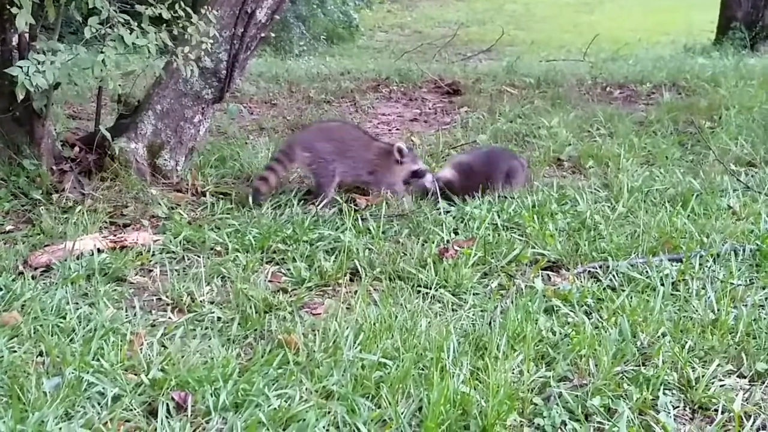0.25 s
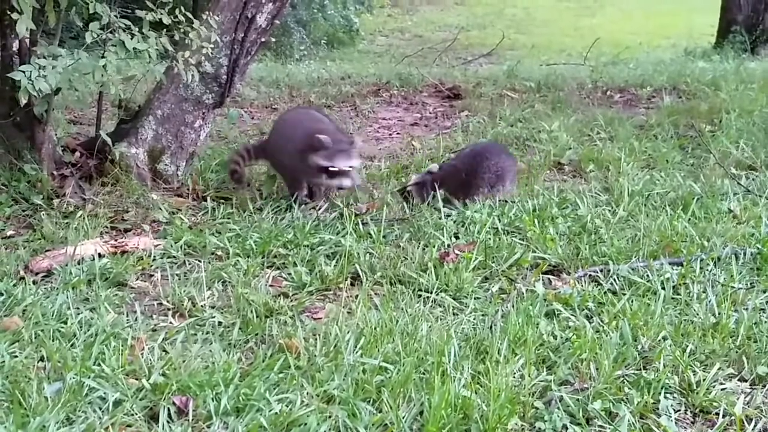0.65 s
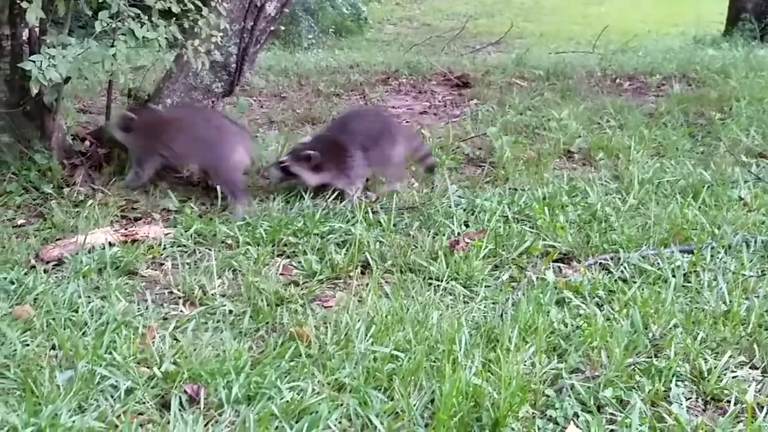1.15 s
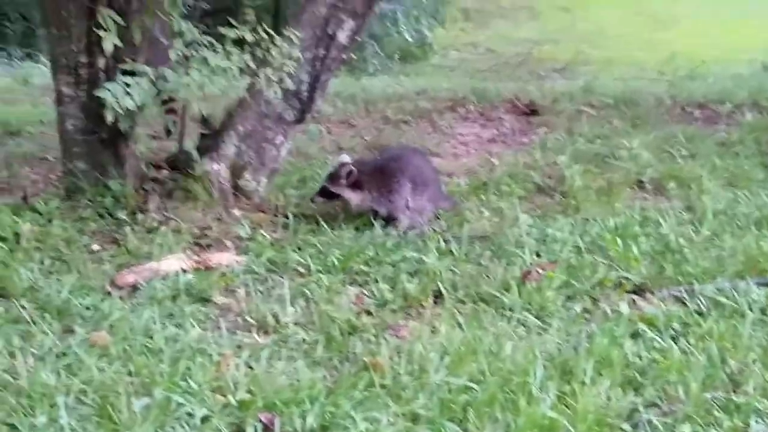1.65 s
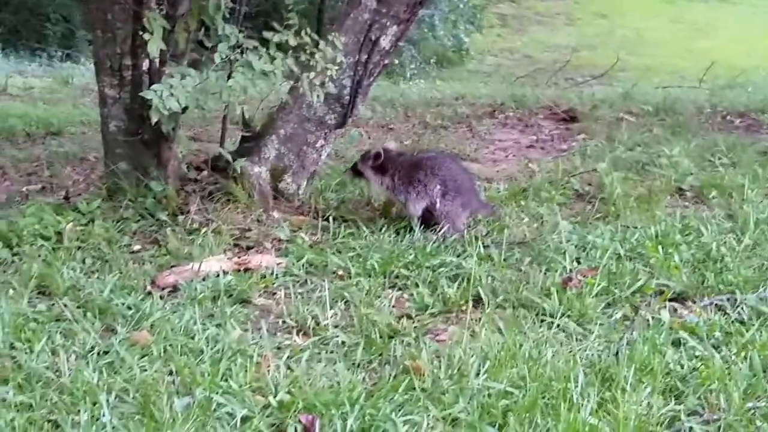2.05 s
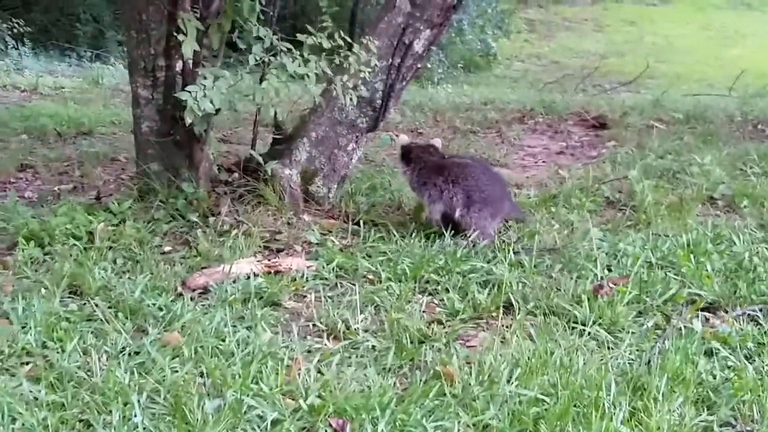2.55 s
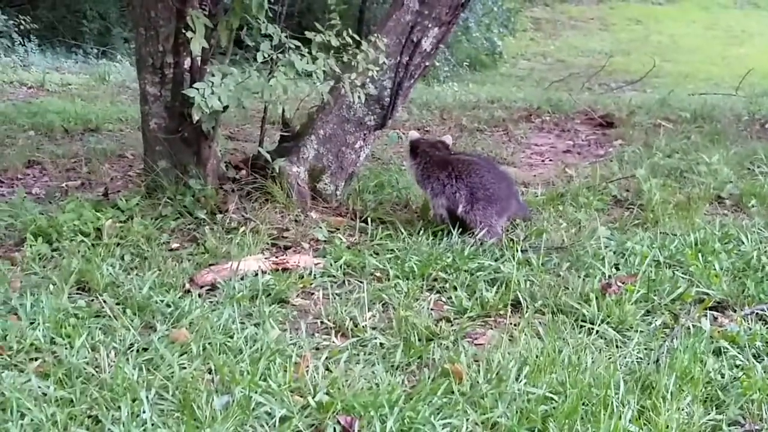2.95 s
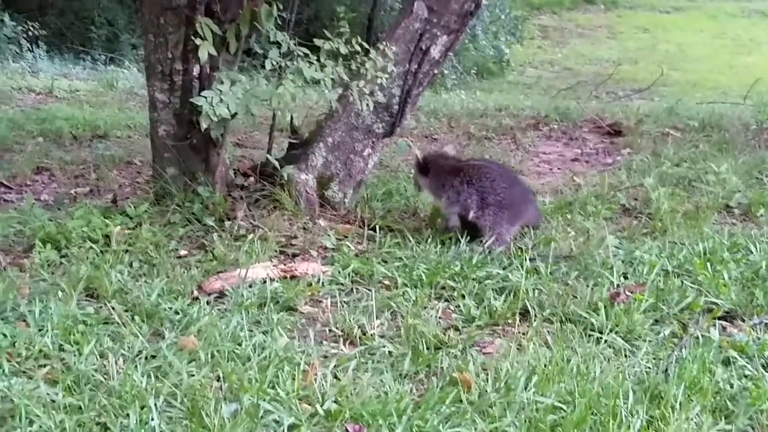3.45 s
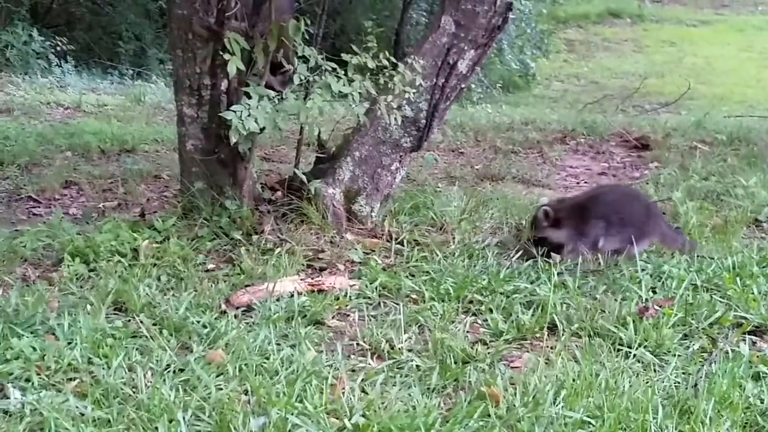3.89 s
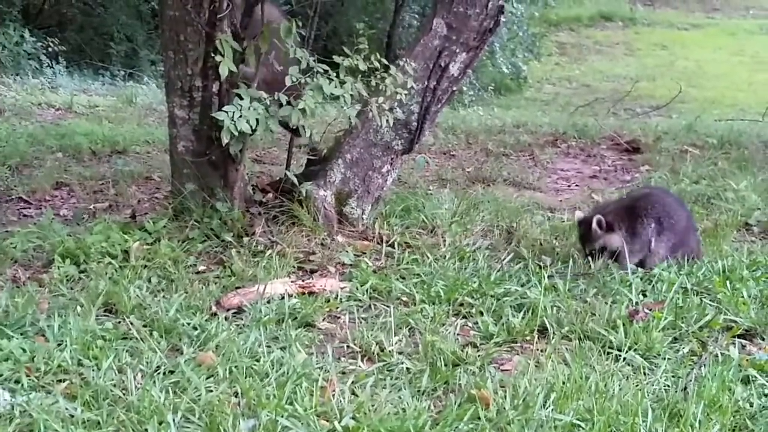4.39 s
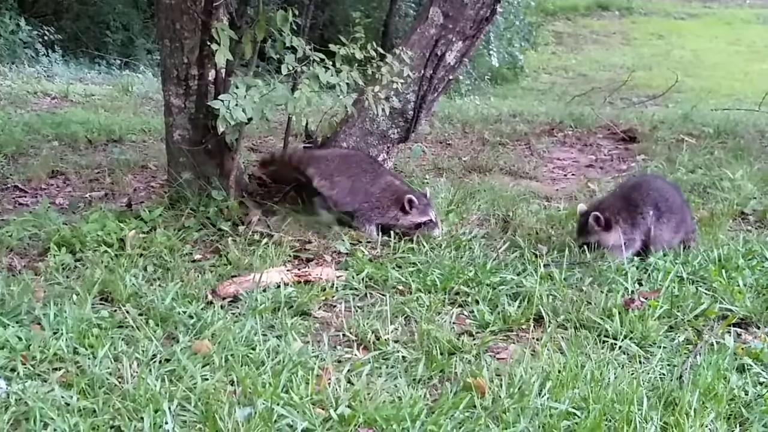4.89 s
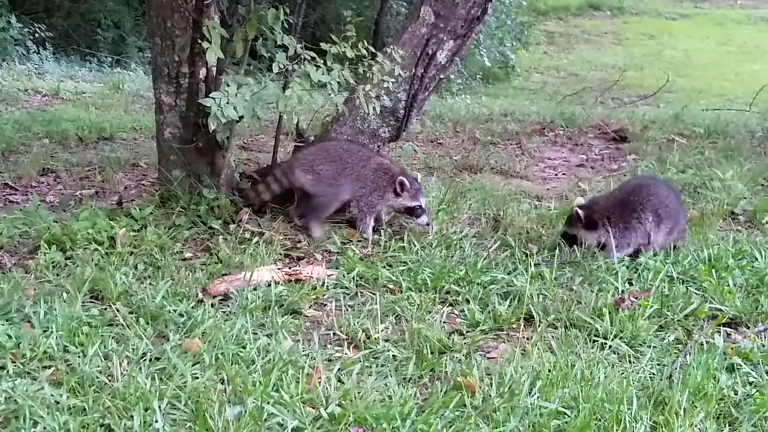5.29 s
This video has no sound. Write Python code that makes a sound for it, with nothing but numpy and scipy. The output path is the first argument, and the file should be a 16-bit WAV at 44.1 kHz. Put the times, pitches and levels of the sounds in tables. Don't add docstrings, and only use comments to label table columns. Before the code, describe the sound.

A steady high insect choir shimmers over faint rumble while distant birds whistle, leaves rustle, and sharp twig snaps click, loudest near the end.

```python
import sys
import numpy as np
from scipy import signal
from scipy.fft import rfft, irfft, next_fast_len
from scipy.io import wavfile
from scipy.ndimage import map_coordinates

SR = 44100
rng = np.random.default_rng(int(sys.argv[2]) if len(sys.argv) > 2 else 0)


def gain_from_db(level_db):
    decades = np.asarray(level_db, float) / 20
    return 10 ** decades


def materialize(psi):
    bounded = np.clip(np.atleast_2d(psi).T, -1, 1)
    quanta = np.round(bounded * 32767).astype(np.int16)
    wavfile.write(sys.argv[1], SR, quanta)


N = 243873

# resonance_hz, width_hz, level_db, left_right_db, strokes_per_s, throb_depth (0-1)
INSECTS = [
    (6395, 240, -61, -8, 79, 0.5),
    (6673, 337, -51, -10, 47, 0.21),
    (6938, 317, -52, -10.5, 109, 0.3),
    (7078, 240, -55, -1, 179, 0.07),
    (8830, 400, -64.5, -15.5, 110, 0.1),
    (9046, 340, -63, 9, 93, 0.1),
    (9440, 430, -71, 3.5, 67, 0),
]
# time_s, level_db
INSECT_SWELL = [(0.0, -47), (5.53, -48)]
INSECT_SWELL_MEAN_DB = -48.5

# start_s, length_s, first_pitch_hz, last_pitch_hz, peak_db
GLIDE_CALLS = [
    (.085, .2, 3900, 4500, -56.5),
    (1.76, .22, 3800, 4130, -58.5),
    (3.1, .09, 3880, 4220, -53.5),
    (4.655, .2, 3780, 4280, -55),
]
RISE_CALLS = [
    (.06, .04, 1950, 2050, -65),
    (.12, .12, 2180, 2740, -56.5),
    (3.38, .02, 2080, 2150, -62),
    (3.42, .15, 2030, 2600, -59),
    (3.57, .04, 2480, 2130, -61),
    (3.61, .02, 2450, 2600, -59),
]
PEEP_CALLS = [(0, .04, 3290, 3260, -64), (.59, .04, 2200, 2300, -63), (.67, .03, 2900, 2820, -66),
              (.74, .02, 2170, 2170, -65), (.81, .04, 2300, 2230, -64), (1.14, .06, 3130, 3230, -66),
              (1.23, .12, 3120, 3040, -61), (1.4, .05, 3060, 3070, -66), (1.15, .07, 2400, 2410, -66),
              (1.27, .04, 2280, 2300, -67), (1.335, .02, 2230, 2190, -62)]
CALL_ATTACK_DB_PER_S, CALL_RELEASE_DB_PER_S = 450, 250
WOOD_T60_S = .5

# frequency_hz, density_db_per_hz
LEAF_SPECTRUM = [(500, -27), (3000, -18.5), (5200, -18.5), (7900, -12.5), (8900, 4), (10500, -8),
                 (12600, -0.5), (14600, -8.5), (15200, -17), (18000, -50)]
# time_s, level_db
STIRRING = [(0, -61), (1.1, -65.5), (1.85, -62), (1.97, -67), (2.3, -71.5), (3.0, -67.5), (3.9, -65.5),
            (4.9, -62.5), (5.28, -67), (5.53, -62)]
# start_s, hold_s, peak_db, left_right_db
LEAF_SCUFFLES = [(0.076, 0.018, -51.5, -0.5), (0.575, 0.047, -63, 1), (1.252, 0.059, -57, 0),
                 (1.374, .04, -61, -2), (1.53, .03, -63, -4), (1.79, .04, -67, 1.5), (3.13, 0.036, -65, .5),
                 (3.42, 0.19, -63.5, .5), (3.785, .05, -59, -2), (3.923, .07, -65, -1.5),
                 (4.055, .04, -60, -1.5), (4.228, .015, -58.5, 2.5), (4.29, .02, -66, -4),
                 (4.44, 0.046, -59.5, -2.5), (4.708, 0.035, -54, -1.5), (4.939, .04, -62, 0.5)]
# start_s, hold_s, peak_db, left_right_db
CLAW_SCRAPES = [
    (3.785, .05, -56, -2.5),
    (4.055, .04, -52.5, -2.5),
    (4.14, .015, -55, -3),
    (4.95, .03, -61, -1.5),
]
# frequency_hz, density_db_per_hz
BARK_SPECTRUM = [(6000, -30), (10000, -14), (12300, .5), (13800, -1.5), (14700, -8), (15200, -22),
                 (18000, -50)]
STIR_ATTACK_DB_PER_S, STIR_RELEASE_DB_PER_S = 246, 160

# start_s, peak_db, left_right_db, pitch_hz
TWIG_SNAPS = [(.442, -40, 0.1, 13000), (1.1608, -33, -3, 12400), (1.3456, -39, -2, 11600),
              (1.3917, -38, 0.1, 11500), (1.5135, -44, -2, 12000), (1.6013, -38, 1.5, 10400),
              (1.7828, -36, 4, 11900), (1.8264, -34, 2.5, 11500), (1.9979, -43, 8, 10800),
              (2.6688, -45, 6, 11900), (3.036, -42, 1.5, 13000), (4.2363, -30, 7, 11200),
              (4.2403, -34, 3, 11100), (4.359, -25.5, 6, 11350), (4.4169, -21, 9, 13000),
              (4.4657, -42, 0.1, 12100), (4.507, -34, 1.5, 11800), (4.694, -34, -1.5, 9400),
              (4.714, -33, -2.5, 12100), (5.0888, -45, -4, 11850)]
SPLINTER_T60_S = 0.02

# start_s, peak_db, left_right_db
TOOTH_CLICKS = [
    (.3178, -35, 1),
    (.3378, -34.5, 0),
    (.3592, -34, 0),
]
# frequency_hz, level_db, t60_s
JAW_MODES = [(2550, 2, .02), (2250, -3, .02), (1750, -1, .009), (1350, -3, .008), (1000, -1, .01),
             (600, -4, .012), (3050, -3, .007)]
# start_s, peak_db, left_right_db
LANDINGS = [
    (1.24, -46, 0),
    (4.713, -38.5, 1.5),
]
# frequency_hz, level_db, t60_s
GROUND_MODES = [(120, -1, .07), (170, 0, .07), (260, -1, .05), (400, -6, .04), (560, -7, .035),
                (720, -11, .03), (1000, -12, .02), (1550, -12, .02)]
# start_s, peak_db, left_right_db
TRUNK_KNOCKS = [
    (4.588, -45, 0),
    (4.676, -46, 0),
]
# frequency_hz, level_db, t60_s
TRUNK_MODES = [(680, 0, .06), (800, -3, .04), (520, -4, .04), (350, -6, .04), (130, -2, .06),
               (1050, -9, .02)]
# start_s, peak_db, left_right_db
STALK_CRACKS = [
    (4.5072, -44.5, -9),
    (4.8974, -51, -8),
]
# frequency_hz, level_db, t60_s
STALK_MODES = [(3680, -1, 0.0098), (5000, -6.5, 0.0092), (2400, -9, 0.01)]

# frequency_hz, density_db_per_hz
AIR_SPECTRUM = [(20, -19), (40, -11), (57, -2), (70, -1), (91, 1.5), (110, -7), (200, -11.5), (330, -18.5),
                (1300, -23), (4100, -25), (5000, -32.5), (7800, -32.5), (10800, -43), (12800, -32.5),
                (14700, -34), (15200, -59)]
# time_s, level_db, brightness_db (air above the bass)
FAR_LEVELS = [(0.0, -47.5, 3), (.5, -46.5, -1.5), (1.3, -48.5, 0.4), (1.9, -46.5, -2), (2.5, -47, -3),
              (4.8, -48.5, -0.3), (5.53, -46, -4.5)]
# frequency_hz, correlation (-1 to 1)
EAR_CORRELATION = [(25, -0.086), (60, 0.96), (150, 0.77), (330, 0.53), (500, 0.096), (800, 0.15),
                   (1200, -0.28), (2000, 0.037)]

# frequency_hz, threshold_db_per_hz
THRESHOLD = [(600, -112), (1600, -103), (3000, -99), (4150, -97.5), (4450, -90.5), (5050, -92.5),
             (5500, -87), (5750, -96), (7000, -105), (8000, -91), (9000, -100), (10200, -96.5),
             (11500, -96.5), (12100, -103.5)]
HOP, BAND, GRID_LEAD = 1024, 16, 17
TOP_HZ, SUDDEN_DB, ABOVE_TOP_DB = 14600, -29, -24


def insects():
    choir = np.zeros((2, N))
    for hz, width_hz, level_db, left_db, rate, depth in INSECTS:
        stroke_hz = rate * (1 + 0.029 * drift(3.1))
        stroke = np.cos(2 * np.pi * np.cumsum(stroke_hz) / SR)
        wing = rng.standard_normal((2, N)) * (1 + depth * stroke) * gain_from_db(0.27 * drift(9))
        for _ in range(3):
            wing = resonance(wing, hz, 2 * width_hz)
        choir += pan(gain_from_db(level_db) * rms_one(wing), left_db)
    return choir * gain_from_db(in_time(INSECT_SWELL)[0] - INSECT_SWELL_MEAN_DB)


def birds():
    out = np.zeros((2, N))
    echoes = trunk_echoes()
    clock, waver, husk = np.arange(N) / SR, drift(110), drift(35)
    voices = [(GLIDE_CALLS, 1.8, -3, 3, .025, 5.5), (RISE_CALLS, .3, 0, 0, .014, .5),
              (PEEP_CALLS, .3, -1.5, -3, .016, .5)]
    for calls, bend, left_db, echo_db, burr, fade_db in voices:
        song = np.zeros(N)
        for s, length, first_hz, last_hz, peak_db in calls:
            done = np.clip((clock - s) / length, -.05, 1.1)
            hz = first_hz + (last_hz - first_hz) * np.expm1(-bend * done) / np.expm1(-bend)
            shape_db = swell_db(s, length, CALL_ATTACK_DB_PER_S, CALL_RELEASE_DB_PER_S)
            level_db = peak_db - fade_db * done + shape_db + 3.0 * husk
            song += np.sin(2 * np.pi * np.cumsum(hz * (1 + burr * waver)) / SR) * gain_from_db(level_db)
        scattered = signal.fftconvolve(song[None], echoes, axes=1)[:, :N]
        out += pan(song + gain_from_db(echo_db) * scattered, left_db)
    return out


def trunk_echoes():
    t = np.arange(int(WOOD_T60_S * SR)) / SR
    echoes = rng.standard_normal((2, len(t))) * gain_from_db(-60 * t / WOOD_T60_S) * np.minimum(t / 0.04, 1)
    return echoes / np.sqrt(np.sum(echoes ** 2, axis=1, keepdims=True))


def leaves():
    cracks_per_s = 3000 * gain_from_db(4.5 * drift(25))
    sizes = gain_from_db(3.5 * np.minimum(rng.exponential(1, (3, N)), 4)) * rng.choice([-1, 1], (3, N))
    cracks = (rng.random((3, N)) < cracks_per_s / SR) * sizes
    heard = rms_one(cracks[:2] + 0.45 * cracks[2])
    mix = heard + 0.71 * rng.standard_normal((2, N))
    litter_power = gain_from_db(in_time(STIRRING)[0]) ** 2 + stirred(LEAF_SCUFFLES)
    litter = gain_from_db(7.0) * np.sqrt(litter_power) * coloured(mix, LEAF_SPECTRUM)
    bark = gain_from_db(3.0) * np.sqrt(stirred(CLAW_SCRAPES)) * coloured(mix[:, ::-1], BARK_SPECTRUM)
    return litter + bark


def twigs():
    out, t = np.zeros((2, N)), np.arange(SR // 25) / SR
    edges = signal.butter(3, [8300, 15500], "band", fs=SR, output="sos")
    for s, peak_db, left_db, hz in TWIG_SNAPS:
        grit = rng.standard_normal((3, len(t)))
        crack = np.sin(2 * np.pi * hz * t) * np.exp(-((t - .0009) / .0001) ** 2)
        splinters = signal.sosfilt(edges, (.6 * grit[:2] + grit[2]) * (t > .001))
        tail = gain_from_db(-9 - 60 * t / SPLINTER_T60_S) * splinters
        start = round(s * SR)
        out[:, start:start + len(t)] += pan(gain_from_db(peak_db + 1.5) * (crack + tail), left_db)
    return out


def animal_blows():
    jaw_and_ground = struck(TOOTH_CLICKS, JAW_MODES) + struck(LANDINGS, GROUND_MODES)
    return jaw_and_ground + struck(TRUNK_KNOCKS, TRUNK_MODES) + struck(STALK_CRACKS, STALK_MODES)


def struck(events, modes):
    out, t = np.zeros((2, N)), np.arange(SR // 10) / SR
    contact = 1 - np.exp(-t / .0004)
    for s, peak_db, left_db in events:
        ring, sign = np.zeros(len(t)), -1
        for hz, db, t60 in modes:
            ring += sign * gain_from_db(db + rng.normal() - 60 * t / t60) * np.sin(2 * np.pi * hz * t)
            sign = -sign
        ring *= contact
        start = round(s * SR)
        out[:, start:start + len(t)] += pan(gain_from_db(peak_db) * ring / abs(ring).max(), left_db)
    return out


def distance():
    level_db, bright_db = in_time(FAR_LEVELS)
    size = next_fast_len(N)
    alike = np.clip(at_hz(EAR_CORRELATION, np.fft.rfftfreq(size, 1 / SR)), -1, 1)
    mid, side = rfft(rng.standard_normal((2, size)))
    ears = np.sqrt(1 + alike) * mid + np.sqrt(1 - alike) * side * [[1], [-1]]
    air = coloured(irfft(ears, size)[:, :N], AIR_SPECTRUM)
    bass = signal.sosfiltfilt(signal.butter(2, 300, fs=SR, output="sos"), air)
    brightness = gain_from_db(bright_db + 0.54 * drift(5))
    return pan(gain_from_db(level_db) * (bass + brightness * (air - bass)), 0.42)


def stirred(events):
    power = np.zeros((2, N))
    for s, hold, peak_db, left_db in events:
        level_db = peak_db + swell_db(s, hold, STIR_ATTACK_DB_PER_S, STIR_RELEASE_DB_PER_S)
        power += pan(gain_from_db(level_db), left_db) ** 2
    return power


def swell_db(start, hold, attack_db_per_s, release_db_per_s):
    clock = np.arange(N) / SR
    attack_db = attack_db_per_s * (clock - start)
    release_db = release_db_per_s * (start + hold - clock)
    return np.minimum(0, np.minimum(attack_db, release_db))


def resonance(x, hz, width_hz):
    r = np.exp(-np.pi * width_hz / SR)
    gain = (1 - r * r) / 2
    return signal.lfilter([gain, 0, -gain], [1, -2 * r * np.cos(2 * np.pi * hz / SR), r * r], x)


def coloured(stereo, spectrum):
    size = next_fast_len(N)
    hz = np.fft.rfftfreq(size, 1 / SR)
    return rms_one(irfft(rfft(stereo, size) * gain_from_db(at_hz(spectrum, hz)), size)[:, :N])


def rms_one(x):
    return x / np.sqrt(np.mean(x ** 2) + 1e-20)


def drift(rate):
    knots = rng.standard_normal(int(N / SR * rate * 2) + 3)
    return map_coordinates(knots, [np.arange(N) / SR * rate * 2], order=3)


def in_time(rows):
    s, *columns = np.transpose(rows)
    return [np.interp(np.arange(N) / SR, s, c) for c in columns]


def at_hz(points, hz):
    table_hz, values = np.transpose(points)
    return np.interp(np.log(hz + 1), np.log(table_hz), values)


def pan(x, left_db):
    return x * gain_from_db(np.outer([.5, -.5], left_db))


def drop_faint_parts(x):
    n, k = np.arange(2 * HOP), np.arange(HOP)
    window = signal.windows.kaiser_bessel_derived(2 * HOP, 4 * np.pi)
    cosines = np.cos(np.pi / HOP * np.outer(n + .5 + HOP / 2, k + .5))
    basis = np.sqrt(2 / HOP) * window[:, None] * cosines
    turn = np.array([[1, 1], [1, -0.99]]) / np.sqrt(2)
    margins = (HOP + GRID_LEAD, 2 * HOP - (N + GRID_LEAD) % HOP)
    halves = np.pad(turn @ x, [(0, 0), margins]).reshape(2, -1, HOP)
    frames = np.concatenate([halves[:, :-1], halves[:, 1:]], axis=2)
    cells, hz = frames @ basis, (k + .5) * SR / 2 / HOP
    restless_db = 2.0 * rng.standard_normal(cells.shape[:2] + (HOP // BAND,)).repeat(BAND, axis=2)
    step = gain_from_db(at_hz(THRESHOLD, hz) + restless_db) * np.sqrt(SR / 2) / .6
    rounded = np.sign(cells) * np.floor(abs(cells) / step + .4) * step * (hz < TOP_HZ)
    sudden = abs(np.diff(frames * window) / 2).max(axis=(0, 2)) > gain_from_db(SUDDEN_DB)
    whole = cells * np.where(hz < TOP_HZ, 1, gain_from_db(ABOVE_TOP_DB))
    kept = np.where(sudden[:, None] & (hz > 5600), whole, rounded)
    frames = kept @ basis.T
    lapped = frames[:, 1:, :HOP] + frames[:, :-1, HOP:]
    return turn @ lapped.reshape(2, -1)[:, GRID_LEAD:GRID_LEAD + N]


def scene():
    return insects() + birds() + leaves() + twigs() + animal_blows() + distance()


def roll_off(x):
    return signal.sosfilt(signal.butter(12, 15890, fs=SR, output="sos"), x)


def record(dry):
    mix = drop_faint_parts(dry)
    return roll_off(mix)


dry = scene()
out = record(dry)
materialize(out)
```